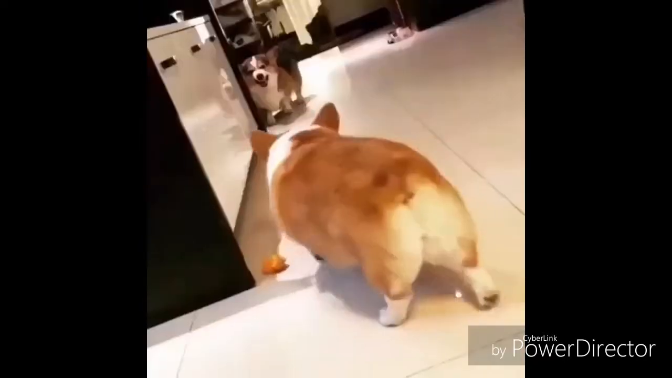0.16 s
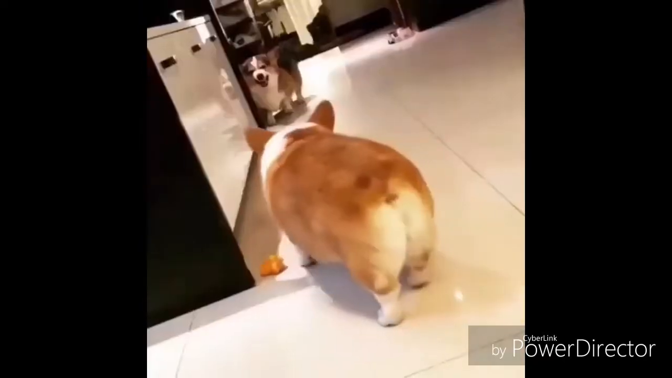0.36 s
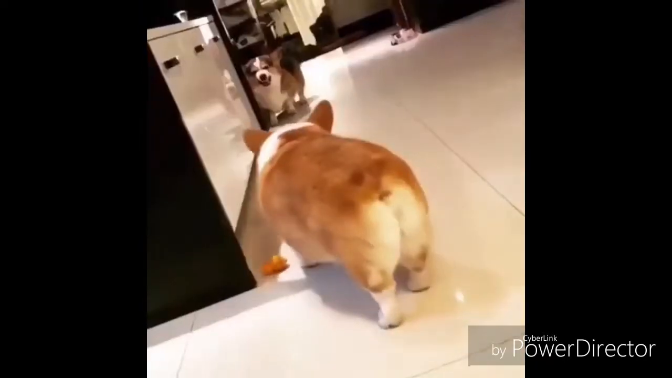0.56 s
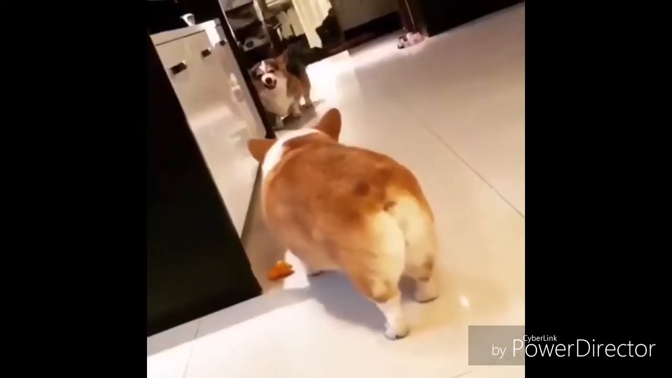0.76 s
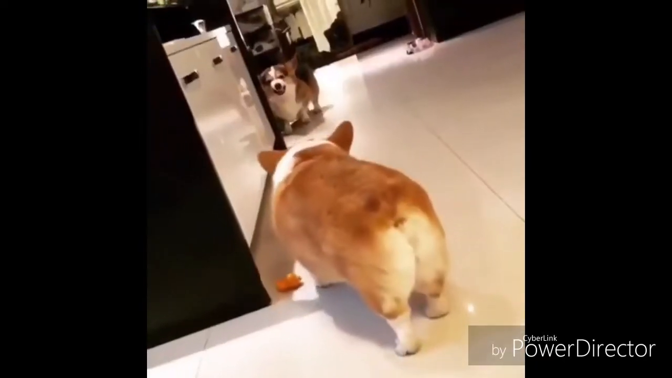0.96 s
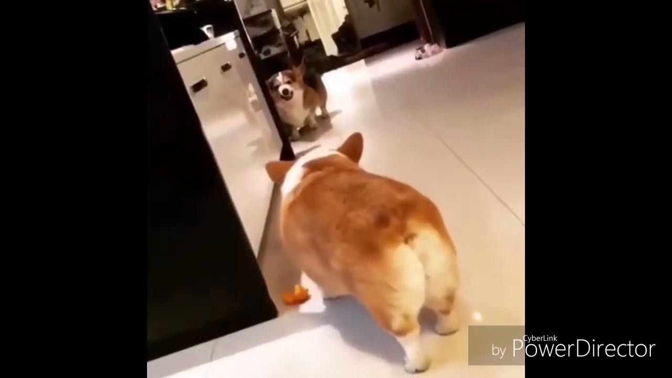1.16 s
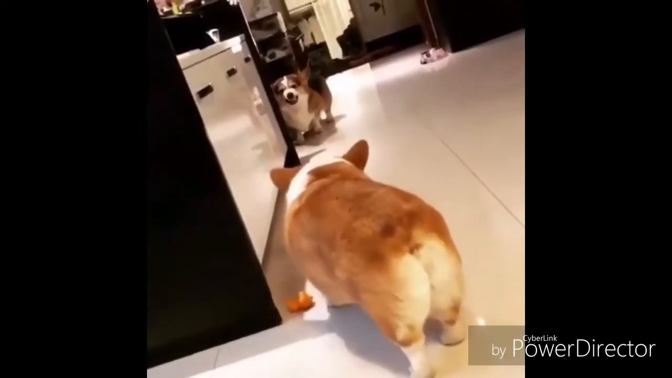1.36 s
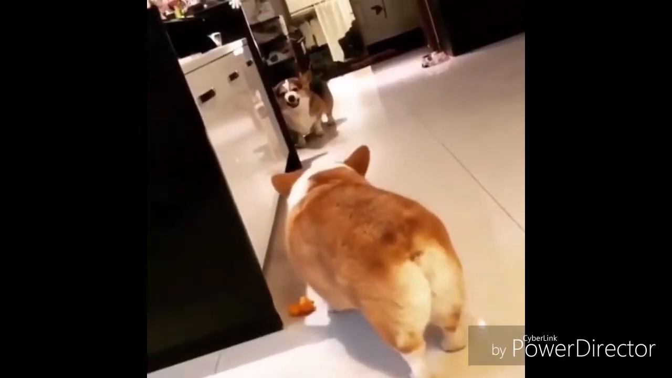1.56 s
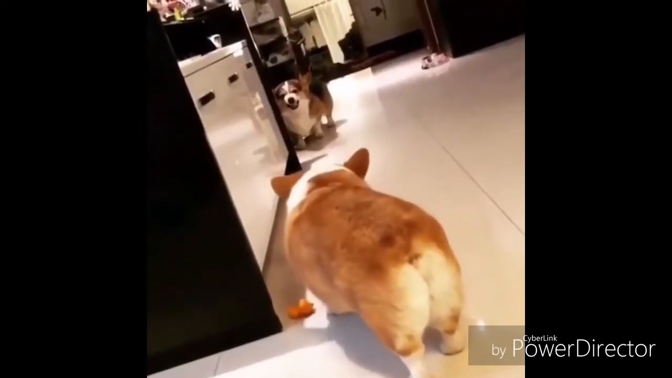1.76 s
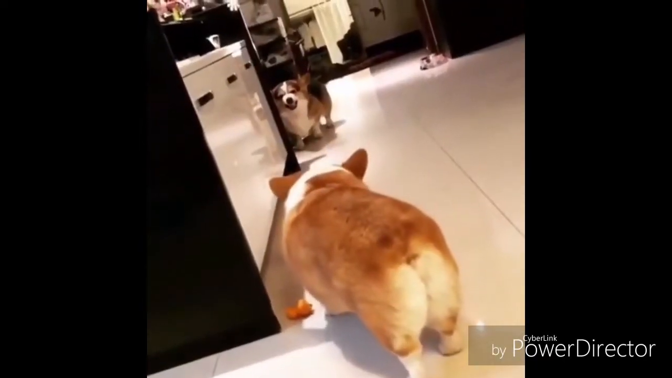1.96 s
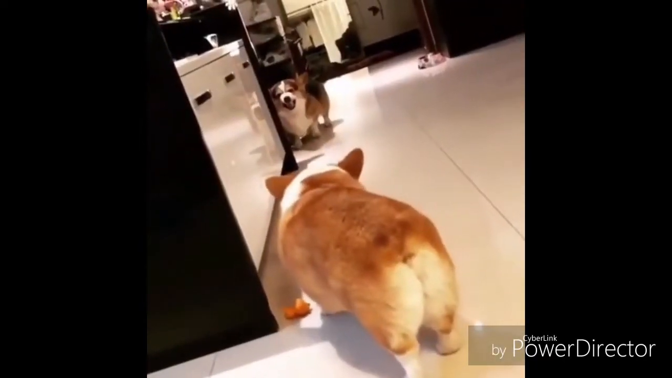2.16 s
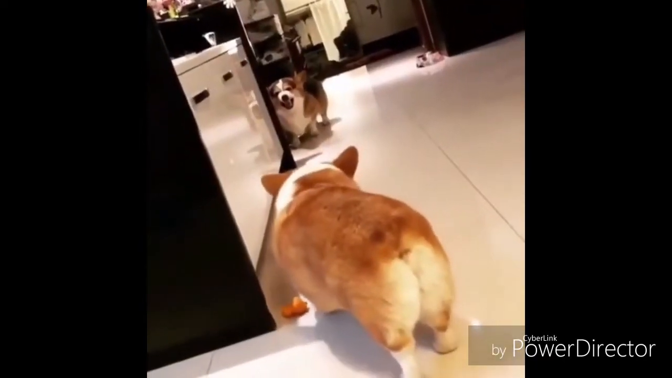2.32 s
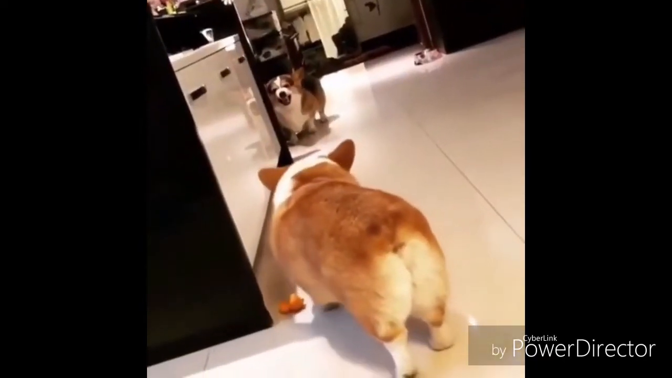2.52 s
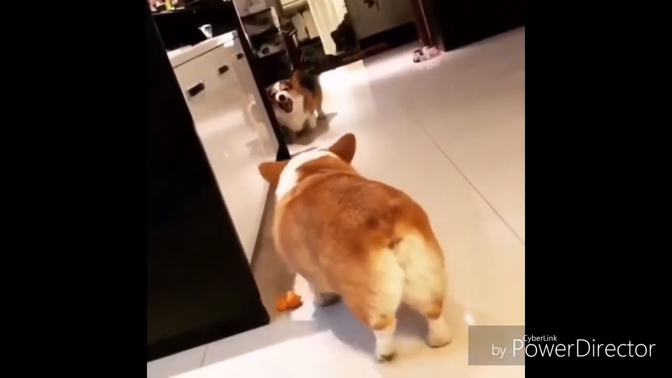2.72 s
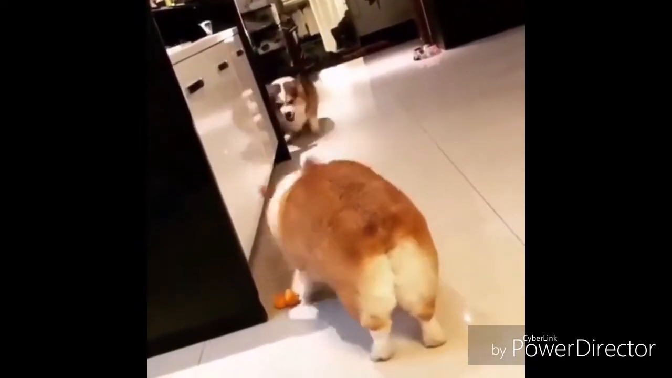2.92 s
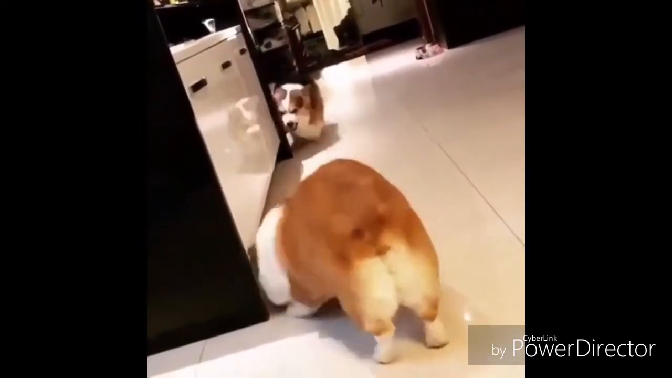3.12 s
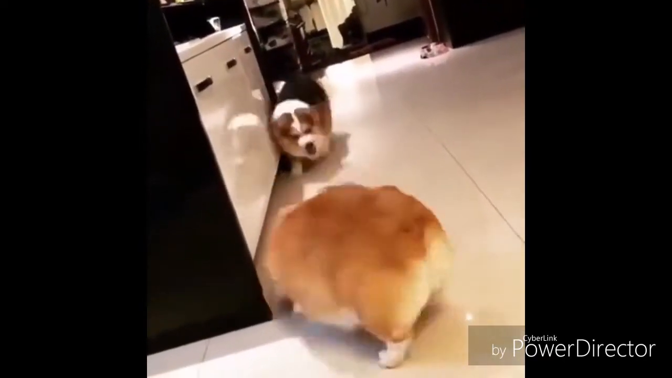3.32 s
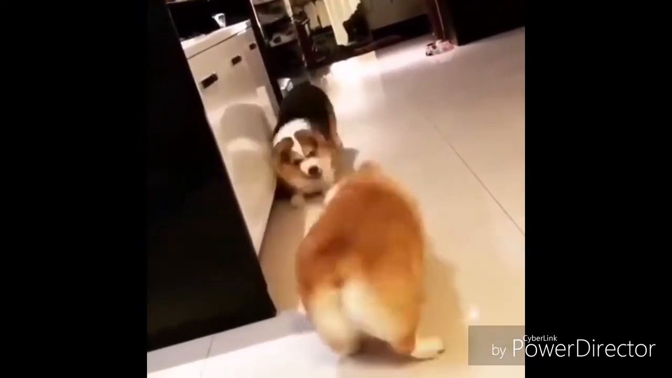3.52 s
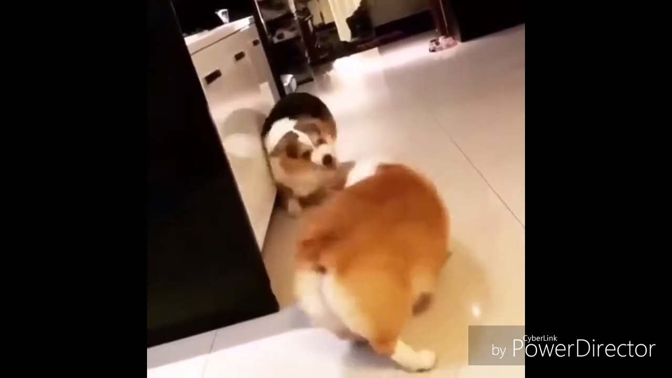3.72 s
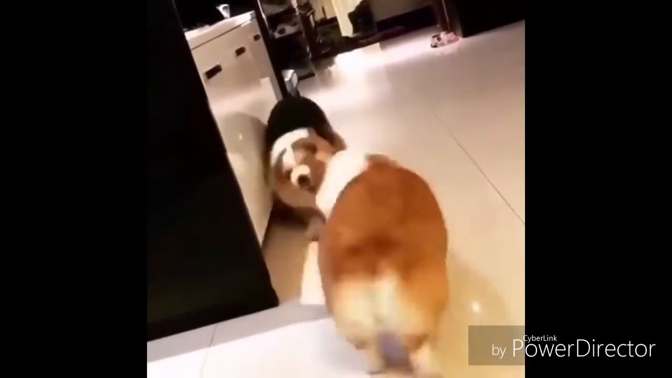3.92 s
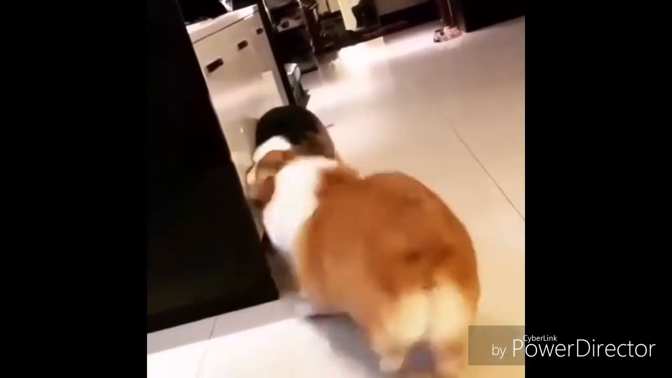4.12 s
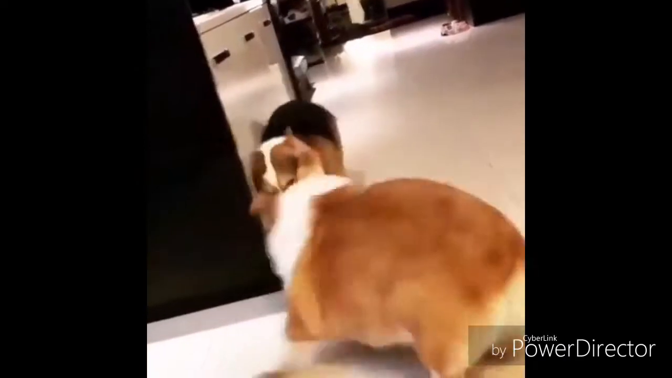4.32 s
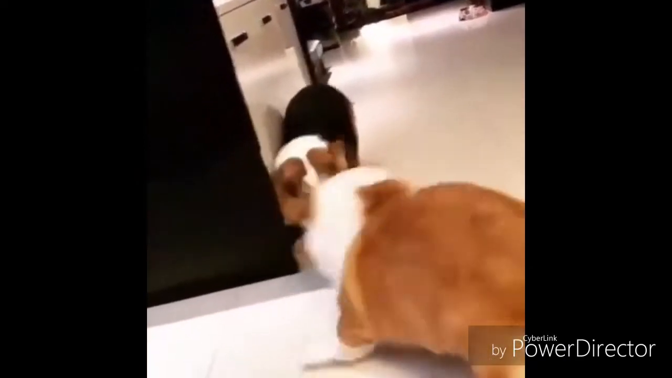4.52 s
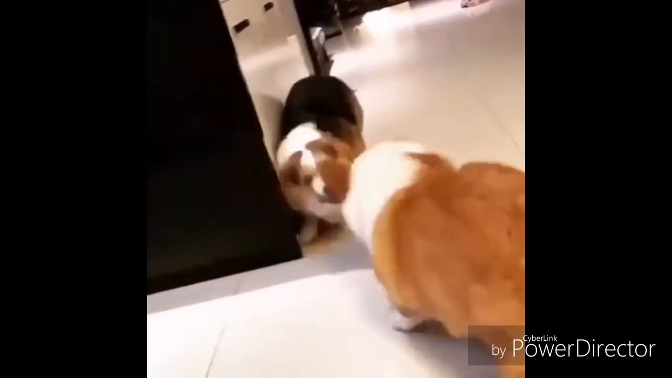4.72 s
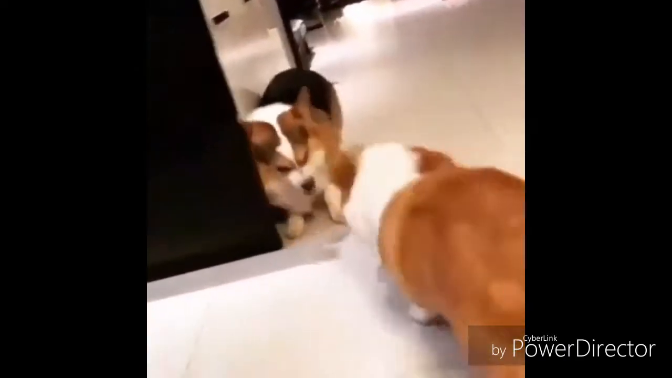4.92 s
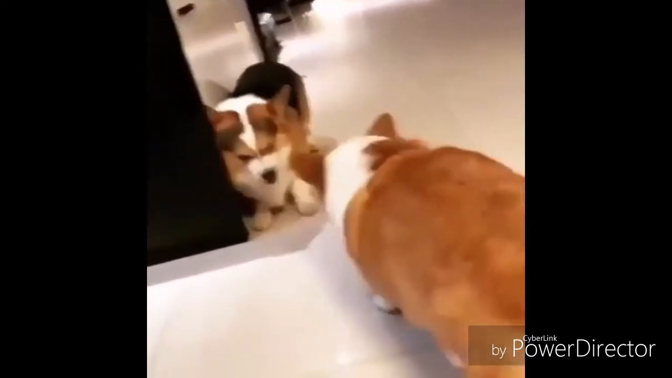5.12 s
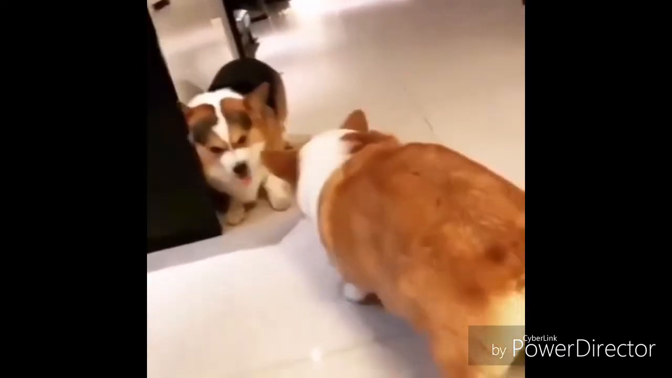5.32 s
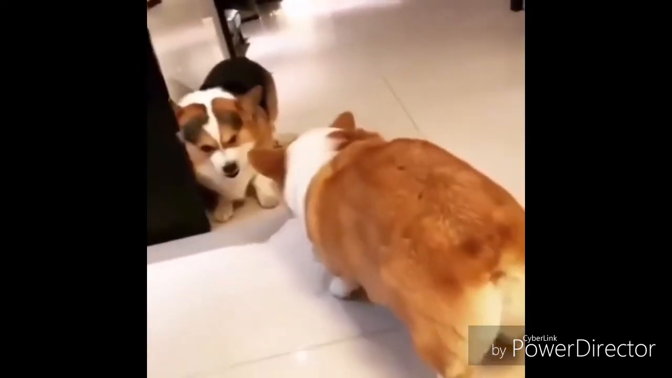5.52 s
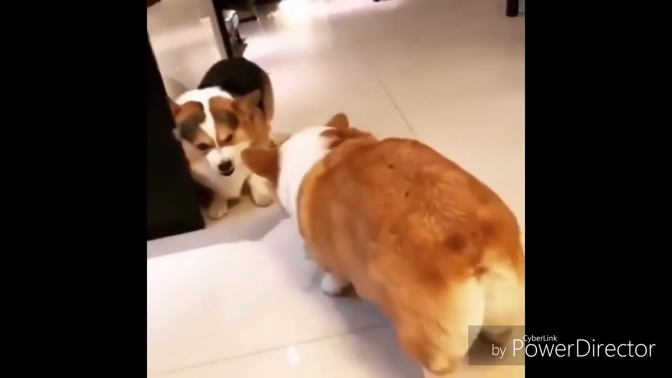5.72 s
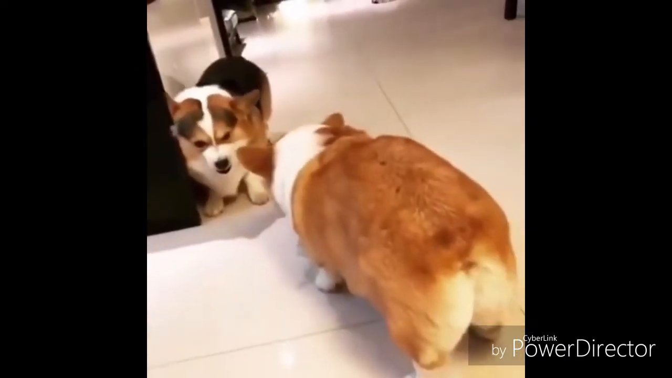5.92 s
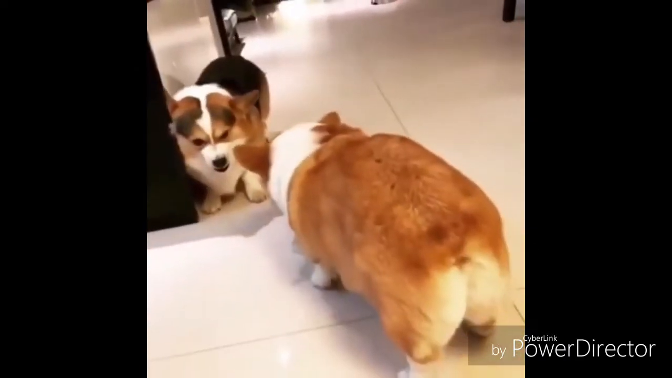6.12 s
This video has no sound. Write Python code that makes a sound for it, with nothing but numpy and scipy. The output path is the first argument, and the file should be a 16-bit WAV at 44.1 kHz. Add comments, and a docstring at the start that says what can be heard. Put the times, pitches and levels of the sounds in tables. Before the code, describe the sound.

A dog snarls and growls low in a hard tiled room, barks hoarsely once, then scuffles as a squeaky toy whines and squeals sharply.

```python
"""Two dogs quarrel over a squeaky toy, heard close in a hard tiled room with a faint bed of room tone.
First one snarls, noise filtered by teeth and lips, gulps once and growls in rough, slow pulses with moans.
Then it gives one hoarse bark, chaotic pulses through a throat of resonances, and the fight growls begin.
Claws scrabble; the toy's reed whines under light bites as bodies bump, then squeals under hard ones.
Among the squeals come hollow gliding knocks, paw steps and octave shrieks; dense echoes ring throughout."""
import sys
import numpy as np
from scipy import signal
from scipy.fft import rfft, irfft, next_fast_len
from scipy.io import wavfile
from scipy.ndimage import uniform_filter1d

SR = 44100
rng = np.random.default_rng(int(sys.argv[2]) if len(sys.argv) > 2 else 0)


def persist_wave(psi):
    """Save psi, clipped to +-1, as 16-bit WAV."""
    counts = np.round(np.clip(psi, -1, 1) * 32767).astype(np.int16)
    wavfile.write(sys.argv[1], SR, np.atleast_2d(counts).T)


N = 272097
TIME = np.arange(N) / SR


def amp(db):
    """Decibels to gain."""
    return 10 ** (np.asarray(db) / 20)


def unit(x):
    """Scales to rms 1."""
    return x / np.sqrt(np.mean(x ** 2) + 1e-20)


def summed_db(*gains):
    """Level of unrelated parts sounding together: their powers add."""
    return 10 * np.log10(sum(g ** 2 for g in gains) + 1e-18)


def read(points, hz):
    """Reads a table on a log-frequency axis."""
    f, value = np.transpose(points)
    return np.interp(np.log(hz + 1), np.log(f + 1), value)


def curve(points):
    """Draws straight lines through (seconds, value) points over the whole scene."""
    return np.interp(TIME, *np.transpose(points))


def peaks(modes, hz):
    """Gain of a set of resonances, their powers added."""
    gains = [amp(db) / (1 + (2 * (hz - f) / width) ** 2) for f, width, db in modes]
    return np.sqrt(sum(gain ** 2 for gain in gains))


def shaped(x, gain):
    """Filters by a gain function of frequency; rms 1."""
    size = next_fast_len(len(x) + 2000)
    spectrum = rfft(x, size) * gain(np.fft.rfftfreq(size, 1 / SR))
    return unit(irfft(spectrum, size)[:len(x)])


def wobble(count, hz):
    """Random wandering up to about hz times a second."""
    noise = rng.standard_normal(count + 4000)
    return shaped(noise, lambda f: 1 / (1 + (f / hz) ** 4))[2000:2000 + count]


def bump(t, width):
    """A smooth hump of height 1 around t = 0."""
    return np.exp(-(t / width) ** 2)


def swells(rows, attack, release, sag_db_per_s=0):
    """Gain over the whole scene: each event rises, sags steadily, and dies away after its length."""
    power = np.zeros(N)
    for s, length, db in rows:
        age = np.maximum(TIME - s, 0)
        rise = np.minimum(age / attack, 1)
        fall = np.exp(-np.maximum(age - length, 0) / release)
        power += (amp(db - sag_db_per_s * age) * rise * fall) ** 2
    return np.sqrt(power)


def resonate(x, hz, width):
    """A steep resonance that follows the curve hz: shift it to zero, smooth, shift back."""
    turn = np.exp(2j * np.pi * np.cumsum(hz) / SR)
    r = np.exp(-np.pi * width / SR)
    smoothed = signal.lfilter([(1 - r) ** 2], [1, -2 * r, r * r], x / turn)
    return 2 * (turn * smoothed).real


def folds(hz, jitter, rough, count):
    """Uneven vocal pulses of count harmonics, each pulse with a puff of noise; rough is the noise share."""
    turns = np.cumsum(hz * (1 + jitter * wobble(len(hz), np.mean(hz) / 2))) / SR
    pulses = sum(np.cos(2 * np.pi * k * turns) for k in range(1, count + 1))
    puffs = (0.11 + np.exp(-(turns % 1) / 0.46)) * rng.standard_normal(len(hz))
    return np.sqrt(1 - rough) * unit(pulses) + np.sqrt(rough) * unit(puffs)


def add(mix, s, sound):
    """Mixes a sound in at time s."""
    part = mix[round(s * SR):][:len(sound)]
    part += sound[:len(part)]


def play(rows, source):
    """Plays each row of an event table at its time."""
    mix = np.zeros(N)
    for s, *row in rows:
        add(mix, s, source(*row))
    return mix


# Colour of the room tone. Each row: frequency in Hz, relative gain in dB.
AIR_COLOUR = [(18, -66.5), (30, -37), (81, -2.5), (139, -5), (157, -10.5), (281, -13), (367, -20.5),
              (456, -17.5), (515, -25), (707, -20.5), (779, -25), (2380, -31), (10000, -42.5), (13000, -84),
              (22000, -120)]
AIR_DB = -60.5  # rms level of the bed


def room_tone():
    """A steady bed of noise, heaviest in the bass."""
    return amp(AIR_DB) * shaped(rng.standard_normal(N), lambda f: amp(read(AIR_COLOUR, f)))


# Hiss through bared teeth. Each row: start in seconds, length in seconds, level in dB.
SNARL_EVENTS = [(.07, 0.13, -63), (.22, 0.28, -59), (.47, 0.54, -59), (1.0, 0.27, -67.5),
                (1.41, 0.32, -64.5), (2.02, 0.19, -72.5), (2.17, 0.22, -62.5), (2.44, 0.073, -67.5),
                (2.6, 0.081, -56.5)]
# A puff of air early in the snarl: start in seconds, level in dB, time to fall 60 dB in seconds.
SNARL_PUFF = (.436, -47.5, .5)
# Colour of the teeth. Each row: frequency in Hz, relative gain in dB.
TEETH_COLOUR = [(350, -32.5), (600, 0), (864, -7.5), (1060, 0), (1230, -8), (1420, 2), (2440, -4.5),
                (2640, -5.5), (3630, -4.5), (4140, -11), (6170, -12), (7900, -18.5), (8890, -13.5),
                (10000, -35.5), (13000, -65.5), (22000, -120)]
# Moving resonance between the curled lips. Each row: time in seconds, frequency in Hz.
LIP_RESONANCE = [(.1, 2992), (.38, 2786), (.45, 2448), (.6, 2110), (.85, 2250), (1.1, 1740), (1.3, 1815),
                 (1.6, 2500), (2.0, 2700), (2.3, 2650), (2.65, 2050)]
PUFF_ATTACK_S = 0.016


def snarl(flutter_db=2, lips_db=-7, lips_width_hz=750):
    """The dog forces air through its teeth; wet lips colour it and make it flutter."""
    s, db, t60 = SNARL_PUFF
    puff_attack = np.clip((TIME - s) / PUFF_ATTACK_S, 0, 1)
    puff = amp(db - 60 * np.maximum(TIME - s, 0) / t60) * puff_attack
    air = rng.standard_normal(N) * amp(flutter_db * wobble(N, 70))
    teeth = shaped(air, lambda f: amp(read(TEETH_COLOUR, f)))
    lips = unit(resonate(air, curve(LIP_RESONANCE), lips_width_hz))
    flow = swells(SNARL_EVENTS, attack=0.11, release=0.05, sag_db_per_s=5.5)
    return (flow + puff) * unit(teeth + amp(lips_db) * lips)


# One low falling gulp, then three short hollow knocks rising in pitch. Each row: start in seconds,
# first pitch in Hz, last pitch in Hz, peak level of the fundamental in dB, length in seconds.
GULP_AND_KNOCKS = [(0.376, 253, 171, -38, 0.046), (3.978, 400.9, 472.4, -29.5, 0.0091),
                   (4.371, 399.9, 520, -33, 0.0086), (4.57, 404, 542.6, -30.5, 0.0082)]


def gulp_or_knock(start_hz, end_hz, db, length, overtone_db=-22):
    """A few nearly pure cycles that glide and die: falling for the gulp, rising for a hollow knock."""
    u = np.linspace(0, 1, int(length * SR))
    phase = 2 * np.pi * np.cumsum(start_hz + (end_hz - start_hz) * u) / SR
    swell = np.sin(np.pi * np.sqrt(u)) ** 2
    overtones = np.sin(2 * phase) + np.sin(3 * phase)
    return amp(db) * swell * (np.sin(phase) + amp(overtone_db) * overtones)


# Centre pitch of the growling, before jitter. Each row: time in seconds, pitch in Hz.
GROWL_PITCH_CURVE = [(.45, 108.3), (.55, 98.3), (1.0, 98.2), (1.4, 101), (1.6, 88.14), (2.0, 92.24),
                     (2.4, 78.2), (3.1, 99.87), (3.5, 118.2), (4.2, 84.02), (5.0, 90.1)]
# Wary growls. Each row: start in seconds, length in seconds, level in dB before the wary trim.
WARY_GROWLS = [(.45, 0.024, -43.5), (.7, .37, -50), (1.08, 0.35, -54), (1.46, 0.37, -54.5), (1.9, .38, -53),
               (2.28, .3, -51.5)]
# Shut-mouth resonances. Each row: frequency in Hz, width in Hz, relative gain in dB.
WARY_COLOUR = [(114.5, 46, -0.5), (171.8, 39, 1.5), (265, 68, -11.5), (296, 50, -6), (420, 1100, -17.5)]
# Open growls in the fight. Each row: start in seconds, length in seconds, level in dB before the fight trim.
OPEN_GROWLS = [(2.69, 0.046, -34.5), (2.79, 0.064, -41), (2.91, 0.26, -46), (3.225, 0.044, -36.5),
               (3.29, 0.09, -44), (3.38, 0.22, -34), (3.645, 0.26, -36.5), (3.98, .1, -40.5),
               (4.08, .04, -31), (4.13, 0.2, -41.5), (4.36, .14, -43), (4.565, 0.1661, -44.5),
               (4.82, .11, -40)]
# Colour of the more open mouth. Each row: frequency in Hz, relative gain in dB.
OPEN_COLOUR = [(47, -34), (80, -5), (124, -4), (216, -0.5), (354, -8), (485, -8.5), (532, -12.5),
               (571, -10.5), (900, -8.5), (1170, -41.5), (1980, -120)]


def growl(wary_trim_db=-3, fight_trim_db=-3):
    """Slow, slack pulses, muffled while the mouth is shut and more open in the fight."""
    pulses = folds(curve(GROWL_PITCH_CURVE), jitter=.25, rough=.85, count=8)
    wary_swell = swells(WARY_GROWLS, attack=.03, release=0.059, sag_db_per_s=6)
    wary = wary_swell * shaped(pulses, lambda f: peaks(WARY_COLOUR, f))
    fight_swell = swells(OPEN_GROWLS, attack=0.015, release=0.015, sag_db_per_s=14)
    fight = fight_swell * shaped(pulses, lambda f: amp(read(OPEN_COLOUR, f)))
    return amp(wary_trim_db) * wary + amp(fight_trim_db) * fight


# Clear low moans within the growling. Each row: start in seconds, length in seconds,
# first pitch in Hz, last pitch in Hz (both before the waver), level at mid-note in dB.
MOAN_EVENTS = [(.45, .25, 104.5, 96, -48.5), (.78, .36, 99.2, 97, -55), (1.2, .26, 101.9, 98, -55.5),
               (2.9, .15, 152, 134, -50), (3.04, .11, 130.3, 117, -47), (3.08, .21, 309.8, 259.2, -46.5),
               (3.38, .11, 241, 185, -39), (3.48, .09, 140.5, 108, -38.5), (3.655, .13, 181, 142, -39.5),
               (4.41, .11, 125.7, 118, -42.5)]
MOAN_FADE_DB = 12.5  # weaker by this much at both ends


def moan(length, start_hz, end_hz, db, overtone_db=-17):
    """The folds settle into a wavering, nearly pure low note that swells and sinks."""
    u = np.linspace(0, 1, int(length * SR))
    hz = start_hz + (end_hz - start_hz) * u
    phase = 2 * np.pi * np.cumsum(hz * (1 + .06 * wobble(len(u), 35))) / SR
    tone = np.sin(phase) + amp(overtone_db) * (np.sin(2 * phase) + np.sin(3 * phase))
    tone = unit(tone * amp(3.5 * wobble(len(u), 25)))
    arch_db = MOAN_FADE_DB * (np.sin(np.pi * u) - 1)
    return amp(db + arch_db) * tone * signal.windows.tukey(len(u), .1)


# Barking throat. Each row: frequency in Hz before the mouth factor, width in Hz, gain in dB.
BARK_THROAT = [(562.8, 79, -4), (756, 120, 0.5), (1025, 240, -4), (1559.4, 130, -1), (1745, 130, -4.5),
               (2076, 100, -11.5), (2261.7, 320, -9), (2900, 420, -28.5)]
# Rasp of the bark. Each row: frequency in Hz, width in Hz, relative gain in dB.
BARK_RASP_COLOUR = [(3050, 1400, 1), (3500, 500, -1.5), (4300, 320, -8.5), (6000, 2200, -9),
                    (8600, 1100, -11)]
BARK_S, BARK_LENGTH_S, BARK_DB = 2.683, .217, -12
BARK_ATTACK_S, BARK_HOLD_S, BARK_RELEASE_DB_PER_S = 0.036, .15, 247
BARK_FIRST_SHARE = .08  # the throat opens with a snap, at this share of full effort
BARK_END_HZ, BARK_TOP_HZ = 285.6, 388  # arch of pitch, before jitter
MOUTH_OPEN, MOUTH_CLOSING_PER_S = 1.05, 1.0  # factor on the throat's resonances
SHOVE_AFTER_S, SHOVE_S, SHOVE_DB, SHOVE_OPENING = .145, 0.0054, 4, .12  # a last shove of air
BARK_RASP_DB, BARK_RASP_AFTER_S, BARK_RASP_S = -20.5, .04, 0.023  # a burst near the end of the attack
BARK_LATE_RASP_DB = -24  # a trace of rasp, against the voice


def bark():
    """Chaotic pulses through an open throat, with a burst of rasp at the start."""
    t = np.arange(1, BARK_LENGTH_S * SR) / SR
    arch = np.sqrt(abs(np.sin(np.pi * t / BARK_LENGTH_S)))
    hz = BARK_END_HZ + (BARK_TOP_HZ - BARK_END_HZ) * arch
    shove = bump(t - SHOVE_AFTER_S, SHOVE_S)
    mouth = MOUTH_OPEN - MOUTH_CLOSING_PER_S * t + SHOVE_OPENING * shove
    attack = np.minimum(BARK_FIRST_SHARE + (t / BARK_ATTACK_S) ** 2, 1)
    release_db = BARK_RELEASE_DB_PER_S * np.maximum(t - BARK_HOLD_S, 0)
    effort = attack * amp(BARK_DB + SHOVE_DB * shove - release_db)
    drive = folds(hz, jitter=.07, rough=.72, count=12)
    # loose tissue chops the flow
    flapping = 2 * np.pi * np.cumsum(112 * (1 + .25 * wobble(len(t), 40))) / SR
    drive = drive * (1 + .6 * np.sin(flapping))
    voice = sum(amp(db) * resonate(drive, f * mouth, width) for f, width, db in BARK_THROAT)
    voice = shaped(voice, lambda f: 1 / (1 + (390 / (f + 1)) ** 4))  # thins the bass below 390 Hz
    voice = voice / np.sqrt(uniform_filter1d(voice ** 2, size=900))  # the lungs hold the power steady
    rasp = shaped(rng.standard_normal(len(t)), lambda f: peaks(BARK_RASP_COLOUR, f))
    burst = amp(BARK_RASP_DB) * bump(t - BARK_RASP_AFTER_S, BARK_RASP_S)
    return effort * (voice + amp(BARK_LATE_RASP_DB) * rasp) + burst * rasp


# Claws scrabbling for grip as a dog lunges. Each row: start in seconds, length in seconds,
# level in dB before the trim.
SCRABBLE_EVENTS = [(2.95, .07, -48), (3.06, .06, -51)]


def scrabble(trim_db=-2, slips_per_s=5000):
    """Claws slip over the tile in many tiny catches."""
    slips = rng.standard_normal(N) * (rng.random(N) < slips_per_s / SR)
    scrape = shaped(slips, lambda f: peaks([(4270, 3000, 2.5), (7800, 2600, -4)], f))  # Hz, width Hz, dB
    return amp(trim_db) * swells(SCRABBLE_EVENTS, attack=0.026, release=0.055) * scrape


# Squeaker resonances that weight the overtones. Each row: frequency in Hz before the squash factor,
# width in Hz before the squash factor, relative gain in dB.
OVERTONE_RESONANCES = [(2500, 720, -6), (4860, 2400, -13.5), (5417.1, 1500, 7.5), (6736, 1300, -0.5),
                       (8936.4, 610, -26.5)]
# Squeaker resonances that colour the rasp; columns as above.
RASP_RESONANCES = [(1280, 860, -11.5), (2260, 330, -2), (4700, 2150, -1), (6650, 1600, 9),
                   (8190, 770, -4.5)]


def reed(hz, tone_db, over_db, rasp_db, squash, tilt_db, rasp_tilt_db, jitter, flutter_db=2, rasp_flutter_db=2):
    """The toy's reed whistles and swoops; its tube picks out overtones, and air rasps past in step."""
    count = len(hz)
    # a low whine holds steady; the pitch trembles more as it is forced up
    tremble = jitter * np.clip((hz - 1000) / 1000, .3, 1)
    hz = hz * (1 + tremble * wobble(count, 450))
    phase = 2 * np.pi * np.cumsum(hz) / SR
    k = np.arange(2, 9)[:, None]
    weights = peaks(OVERTONE_RESONANCES, k * hz / squash) * amp(tilt_db * np.log2(k))
    # the reed never closes the same way twice, so each overtone wavers in strength and phase
    weights = weights * amp([3 * wobble(count, 130) for _ in k])
    unrest = np.clip((hz - 1200) / 1200, .3, .8)
    drift = np.array([unrest * wobble(count, 300) for _ in k])
    overtones = (weights * np.sin(k * phase + drift + k ** 2)).sum(0)
    overtones = overtones / np.sqrt((weights ** 2).sum(0))
    voice = np.sqrt(2) * (amp(tone_db) * np.sin(phase) + amp(over_db) * overtones)
    voice = voice * unit(amp(flutter_db * wobble(count, 310)))
    # near the top of its range the reed falters and the whistle breaks up
    strain = np.clip((hz - 3900) / 500, 0, 1)
    voice = voice * (1 - strain * (.5 + .5 * np.tanh(2 * wobble(count, 110))))
    air = rng.standard_normal(count) * (1 + 0.67 * np.cos(phase))
    rasp = shaped(air, lambda f: peaks(RASP_RESONANCES, f / squash) * amp(rasp_tilt_db * np.log2(f + 500)))
    rasp = amp(rasp_db) * unit(rasp * amp(rasp_flutter_db * wobble(count, 210)))
    return (voice + rasp) * signal.windows.tukey(count, .02)


# Light bites make the toy whine. Each row: start in seconds, length in seconds, pitch at the ends in Hz,
# pitch in the middle in Hz (both before waver and jitter), then mid-note levels in dB of the fundamental,
# the overtones and the rasp, overtone tilt in dB per octave, rasp tilt in dB per octave.
WHINE_EVENTS = [(3.222, .031, 1122, 1180, -34.5, -41.5, -35.5, 1.5, -7),
                (3.246, 0.039, 1128, 1215, -33, -22.5, -30, 0.5, -1.5),
                (3.285, 0.048, 1350, 1410, -33.5, -26, -37.5, 5, -5.5),
                (3.322, 0.045, 1353, 1400, -41.5, -37.5, -36.5, 2.5, -5.5),
                (3.395, .028, 1216, 1400, -20.5, -27.5, -27, -21, -7),
                (3.426, .084, 1253, 2130, -22, -23.5, -23.5, -19, -2.5),
                (3.485, .055, 1188, 1300, -40.5, -33, -27.5, -5, -2.5),
                (3.598, 0.059, 1260, 1370, -30.5, -27.5, -36.5, -0.5, -2.5),
                (3.653, 0.044, 1800, 2110, -29, -20.5, -16.5, 1, -1.5),
                (3.698, 0.061, 1398, 1200, -39.5, -28.5, -27.5, 1.5, -1),
                (3.762, 0.087, 1213, 1430, -33, -27, -28.5, -3.5, -3),
                (3.925, 0.083, 1210, 1430, -34, -27, -26, -1, 0)]
WHINE_FADE_DB, WHINE_RASP_GROWTH_DB = 6, 8  # weaker at both ends; hoarser as the air runs out
WHINE_SQUASH, WHINE_JITTER = 0.98, 0.02081  # factor on the squeaker's resonances; greatest share of pitch
WHINE_WAVER_DB, WHINE_WAVER_SHARE, WHINE_WAVER_HZ = 1.5, .018, 80  # unsteady bite: level, pitch, speed


def whine(length, end_hz, mid_hz, tone_db, over_db, rasp_db, tilt_db, rasp_tilt_db):
    """Pitch bends and strength swells in one unsteady arch as the bite squeezes the reed."""
    u = np.linspace(0, 1, int(length * SR))
    arch = np.sin(np.pi * u)
    waver = wobble(len(u), WHINE_WAVER_HZ)
    hz = (end_hz + (mid_hz - end_hz) * arch ** 2) * (1 + WHINE_WAVER_SHARE * waver)
    fade_db = WHINE_FADE_DB * (arch - 1)
    voice_db = fade_db + WHINE_WAVER_DB * waver
    hoarse_db = fade_db + WHINE_RASP_GROWTH_DB * (u - .5)
    return reed(hz, tone_db + voice_db, over_db + voice_db, rasp_db + hoarse_db,
                WHINE_SQUASH, tilt_db, rasp_tilt_db, WHINE_JITTER)


# Bodies bumping. Each row: start in seconds, length in seconds, level in dB before the trim.
BUMP_EVENTS = [(3.5, .5, -53.5), (4.085, .11, -35.5), (4.25, .04, -45.5), (4.84, .08, -50)]


def scuffle(trim_db=-4):
    """Low rumble of shoving bodies: noise around 60 Hz."""
    rumble = shaped(rng.standard_normal(N), lambda f: peaks([(60, 33, 0)], f))
    return amp(trim_db) * swells(BUMP_EVENTS, attack=.03, release=0.053) * rumble


# Hard bites: squeals leap to a whistle, hold it thinly, drop back and end in rasp.
# Each row: start in seconds, leap and drop in seconds after the start, length in seconds, top pitch in Hz
# before jitter, then reference levels in dB of leap, hold, drop and closing rasp,
# overtone tilt in dB per octave.
SQUEAL_EVENTS = [(3.829, 0.0052, .069, .1, 4562, -12.5, -26.5, -17.5, -19.5, 1),
                 (4.009, 0.0089, 0.087, 0.15, 4420, -11.5, -22.5, -14, -16, 6),
                 (4.164, 0.018, 0.09, 0.12, 4480, -10, -24.5, -15, -15, 1),
                 (4.395, .01, 0.092, 0.15, 4570, -10.5, -25, -13.5, -18.5, 1),
                 (4.601, .01, 0.088, .14, 4826, -10, -24.5, -11.5, -13.5, 4),
                 (4.832, .012, .081, .14, 4740, -9.5, -28, -13.5, -14.5, 15)]
REST_HZ, LEAP_S, DROP_S = 1196, 0.0044, 0.0088  # pitch off the whistle; time scales of the two glides
LEAP_PUSH_S, DROP_PUSH_S = 0.011, 0.011  # a push of air drives each glide
LET_GO_LEAD_S, LET_GO_S = .007, 0.0021  # the jaws let go abruptly, just ahead of the drop
CLOSING_DB_PER_S = 113.5  # fade of the closing rasp
GLIDE_WAVER_DB, GLIDE_WAVER_HZ = 3, 160  # the reed speaks unevenly along a glide
HELD_VOICE_DB, OPENING_RASP_DB = -7, -6.5  # the held note is mostly air; rasp spits before the leap
# Make-up of the glides as a pair: dB at resting pitch, dB at top pitch.
GLIDE_TONE = (-17.5, 0)
GLIDE_OVERTONES = (-9.5, -3)
GLIDE_RASP = (-5.5, -8.5)
SQUEAL_SQUASH, SQUEAL_JITTER = 0.99, .018  # factor on the squeaker's resonances; greatest share of pitch


def squeal(leap, drop, length, top_hz, leap_db, hold_db, drop_db, closing_db, tilt_db, rasp_tilt_db=1.0):
    """The reed flips up to a whistle and back: clear in both glides, airy between, bare rasp at both ends."""
    t = np.arange(0, length, 1 / SR)
    up = .5 + .5 * np.tanh((t - leap) / LEAP_S)
    down = .5 + .5 * np.tanh((t - drop) / DROP_S)
    height = up * (1 - down)  # 0 at resting pitch, 1 at the top
    let_go = .5 + .5 * np.tanh((t - drop + LET_GO_LEAD_S) / LET_GO_S)
    leap_push = amp(leap_db) * bump(t - leap, LEAP_PUSH_S)
    drop_push = amp(drop_db) * bump(t - drop, DROP_PUSH_S) * let_go
    pushes = (leap_push + drop_push) * amp(GLIDE_WAVER_DB * wobble(len(t), GLIDE_WAVER_HZ))
    tone, overtones, rasp = (pushes * amp(low + (top - low) * height)
                             for low, top in (GLIDE_TONE, GLIDE_OVERTONES, GLIDE_RASP))
    opening = amp(leap_db + OPENING_RASP_DB) * (1 - up)
    held = amp(hold_db) * height
    closing = amp(closing_db - CLOSING_DB_PER_S * np.maximum(t - drop, 0)) * let_go
    whistle = amp(HELD_VOICE_DB) * held
    hz = REST_HZ + (top_hz - REST_HZ) * height
    return reed(hz, summed_db(tone, whistle), summed_db(overtones, whistle),
                summed_db(rasp, opening, held, closing), SQUEAL_SQUASH, tilt_db, rasp_tilt_db, SQUEAL_JITTER)


# Paws on the tiles. Each row: start in seconds, pad thud in dB, claw tick in dB (both before halving).
STEP_EVENTS = [(4.094, -30.5, -49), (4.18, -29, -31), (5.342, -59.5, -46.5), (5.857, -45, -60),
               (5.888, -52, -57), (6.062, -48, -56.5), (6.113, -50.5, -62)]
# Resonances of the pad's thud. Each row: frequency in Hz, width in Hz, relative gain in dB.
PAD_COLOUR = [(609.93, 240, 14.5), (149.6, 200, -8)]
# Resonances of the claw's tick; columns as above.
CLAW_COLOUR = [(2400, 700, -14.5), (4500, 660, 3.5), (6850, 6000, -16.5)]


def step(pad_db, claw_db, pad_t60=0.12, claw_t60=.04):
    """A soft pad thuds as its claws tick on the tile; t60 is the seconds to fall 60 dB."""
    t = np.arange(SR // 8) / SR
    pad = shaped(rng.standard_normal(len(t)), lambda f: peaks(PAD_COLOUR, f))
    claw = shaped(rng.standard_normal(len(t)), lambda f: peaks(CLAW_COLOUR, f))
    thud = pad * amp(pad_db - 60 * t / pad_t60)
    tick = claw * amp(claw_db - 60 * t / claw_t60)
    return .5 * (thud + tick)


# The held whistle catches for an instant and its octave shrieks. Each row: start in seconds,
# length in seconds, whistle pitch in Hz before jitter, overtone level in dB before the swell.
SHRIEK_EVENTS = [(4.622, 0.028, 4630, -5), (4.857, 0.011, 4715, -13), (4.876, 0.012, 4650, -8),
                 (4.89, 0.021, 4740, -16.5)]


def shriek(length, hz, db, tone_db=-14, rasp_db=-15, jitter=0.00795):
    """A brief swell of the reed's overtones, chiefly the whistle's octave."""
    swell = np.hanning(int(length * SR))
    whistle = np.full(len(swell), hz)
    return swell * reed(whistle, db + tone_db, db, db + rasp_db, SQUEAL_SQUASH, 0, 0, jitter)


# Ring of the room. Each row: frequency in Hz, time to fall 60 dB in seconds.
ROOM_RING = [(100, 0.97), (600, 0.53), (1600, 0.52), (3500, 0.52), (6500, 0.39), (9500, 0.33)]


def echoes(x):
    """Dense reflections off tile and cabinets, each band dying at its own speed."""
    taps = rng.standard_normal(SR) * (rng.random(SR) < .15) * (TIME[:SR] > .004)
    hz, t, bands = signal.stft(taps, SR, nperseg=256)
    decay = amp(-60 * t / read(ROOM_RING, hz)[:, None])
    tail = signal.istft(bands * decay, SR, nperseg=256)[1]
    return signal.fftconvolve(x, tail / np.linalg.norm(tail))[:N]


# Faint stereo width added to the toy's echoes. Each row: frequency in Hz, gain in dB.
STEREO_WIDTH = [(500, -42), (1500, -44.5), (3000, -51), (6000, -34.5), (9500, -31.5)]


def scene(toy_room_db=-5, bark_room_db=-4, small_room_db=-9):
    """A nearly mono scene, with a faint stereo width added to the toy's echoes."""
    toy = play(WHINE_EVENTS, whine) + play(SQUEAL_EVENTS, squeal) + play(SHRIEK_EVENTS, shriek)
    barking = play([(BARK_S,)], bark)
    small = growl() + snarl() + scrabble()
    small += play(MOAN_EVENTS, moan) + play(GULP_AND_KNOCKS, gulp_or_knock) + play(STEP_EVENTS, step)
    toy_send = amp(toy_room_db) * toy
    send = toy_send + amp(bark_room_db) * barking + amp(small_room_db) * small
    mid = toy + barking + small + scuffle() + room_tone() + echoes(send)
    width_gain = amp(read(STEREO_WIDTH, np.fft.rfftfreq(N, 1 / SR)))
    side = irfft(rfft(echoes(toy_send)) * width_gain, N)
    return np.array([mid + side, mid - side])


START_S, EDGE_HZ = .08, 9850  # silence before the opening; top of the band


def record(dry):
    """The microphone opens over 5 ms, rounds off the loudest peaks and limits the band."""
    opened = dry * np.clip((TIME - START_S) * 200, 0, 1)
    rounded = opened / (1 + (opened / .76) ** 6) ** (1 / 6)
    lowpass = signal.firwin(361, EDGE_HZ, window=("kaiser", 9), fs=SR)
    return signal.oaconvolve(rounded, lowpass[None], "same")


dry = scene()
out = record(dry)
persist_wave(out)
```